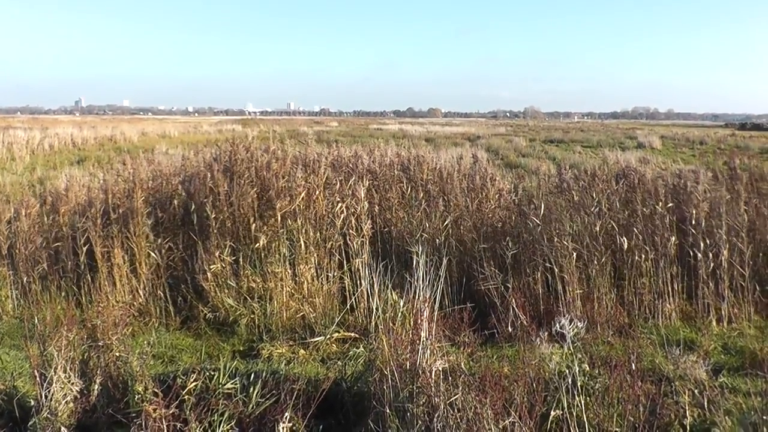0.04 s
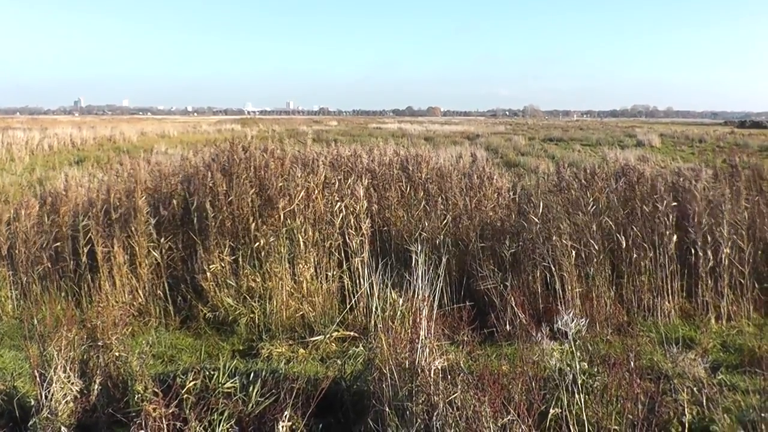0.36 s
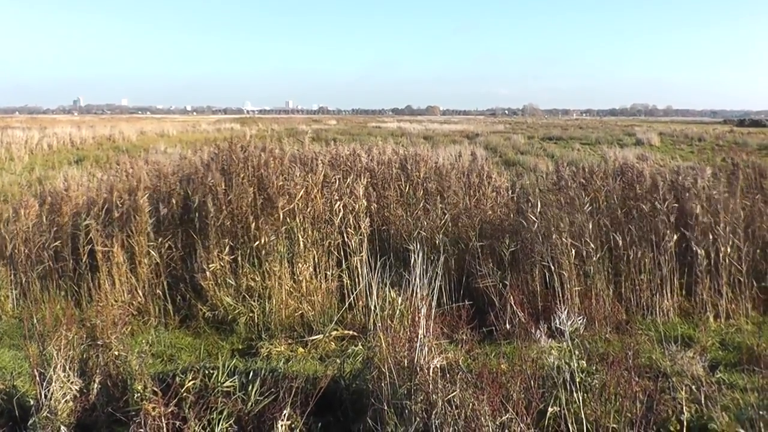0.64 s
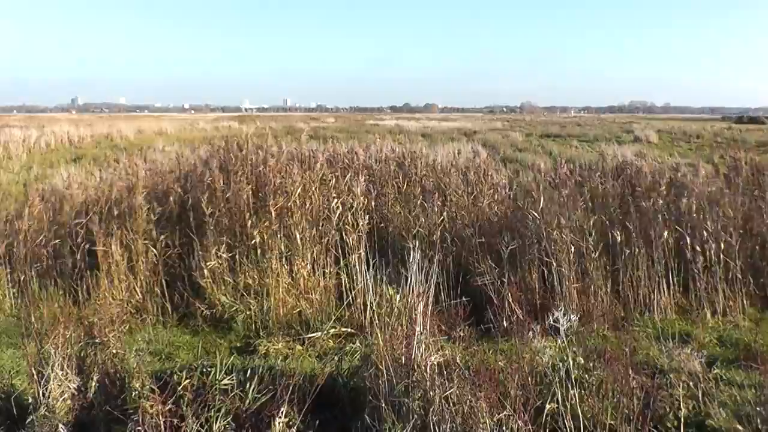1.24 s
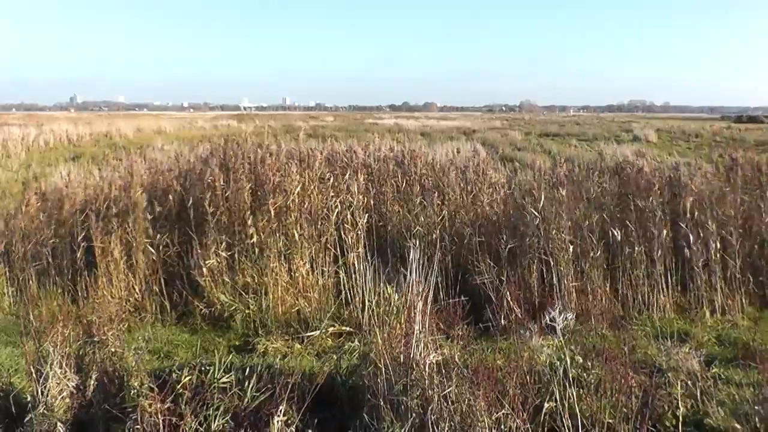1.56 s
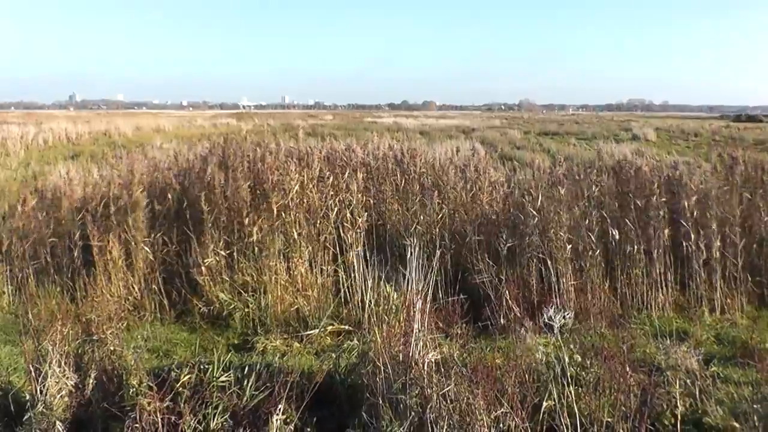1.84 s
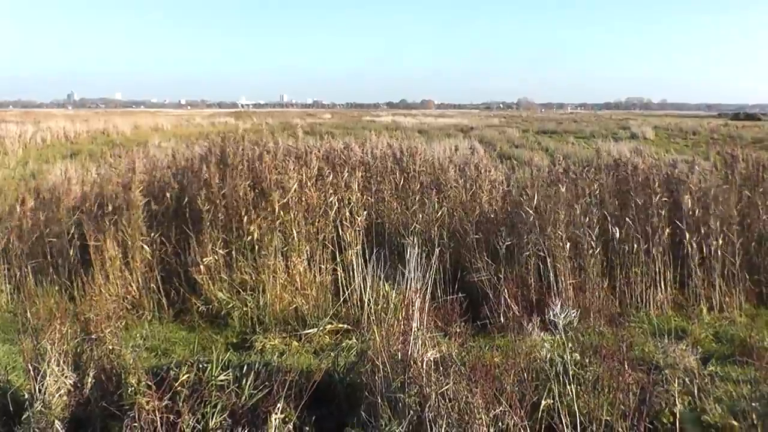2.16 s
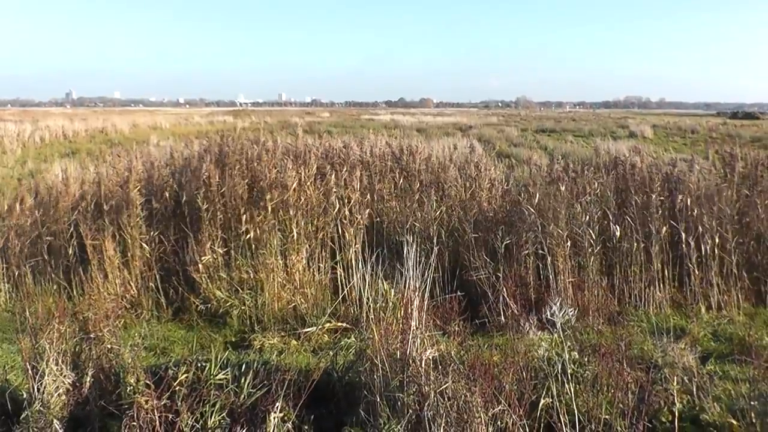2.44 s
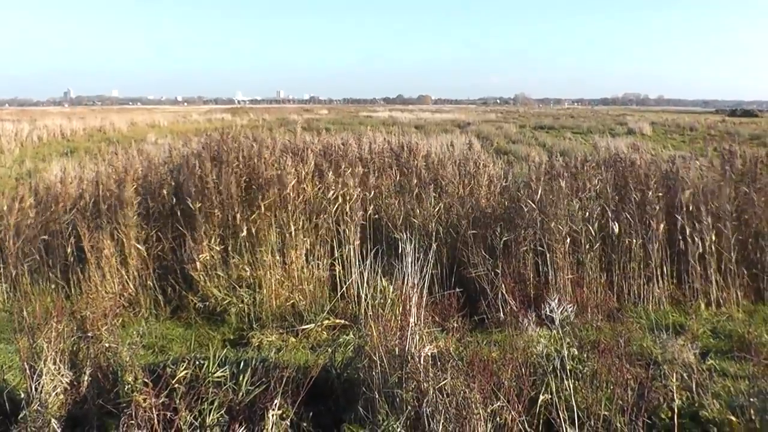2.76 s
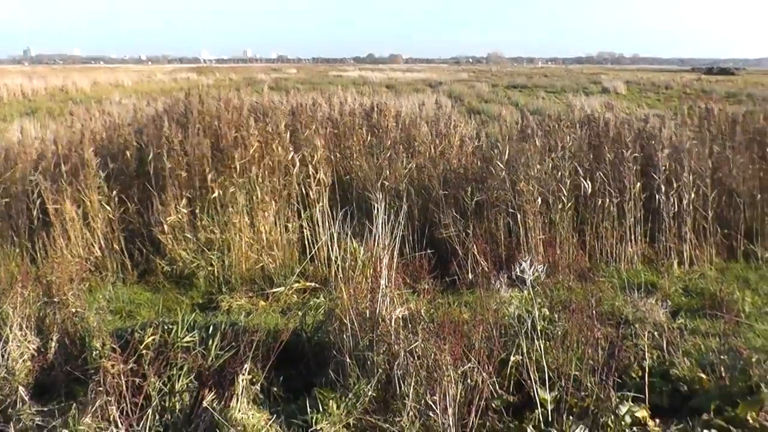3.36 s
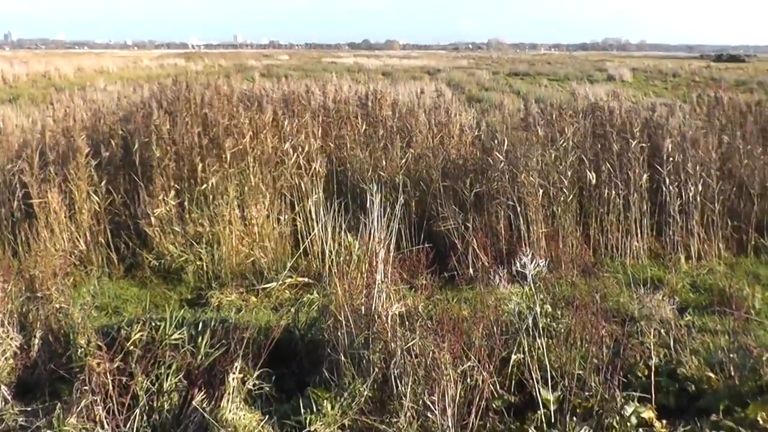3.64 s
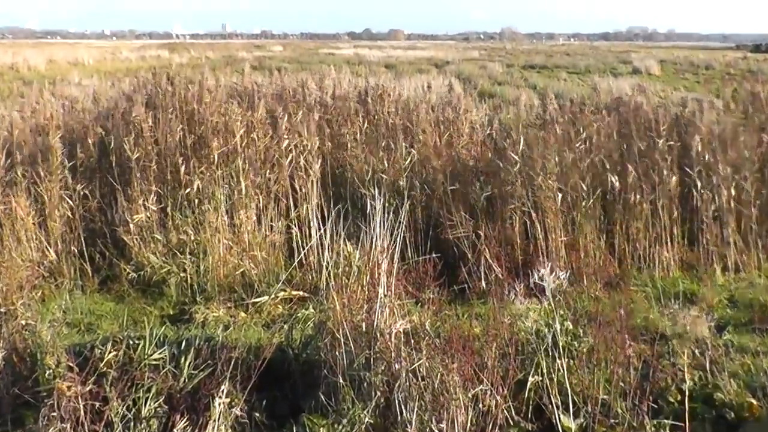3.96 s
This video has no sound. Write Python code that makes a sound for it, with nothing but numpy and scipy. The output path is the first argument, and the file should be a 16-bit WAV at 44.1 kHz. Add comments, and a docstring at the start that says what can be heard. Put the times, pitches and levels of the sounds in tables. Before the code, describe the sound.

A marsh bird squeals twice from the reeds over faint wind and hiss.

```python
"""Wind buffets the microphone at a reedbed, over distant air and hiss, as a hoarse groan rises.
It is a water rail hidden a little to the left, calling twice: each groan climbs to a held whistle
and falls away. The harmonics sweep through fixed throat resonances and scatter briefly among the
stems. Between the calls, dry reeds tick and brush."""
import sys
import numpy as np
from scipy import signal
from scipy.fft import rfft, irfft
from scipy.io import wavfile

SR = 44100
rng = np.random.default_rng(int(sys.argv[2]) if len(sys.argv) > 2 else 0)


def unload_audio(sound):
    """Save the sound as a 16-bit wav file, at the path given as the first command line argument."""
    columns = np.transpose(np.atleast_2d(sound))
    # keep every value between -1 and 1, then stretch to whole-number steps
    steps = np.round(np.clip(columns, -1, 1) * 32767)
    wavfile.write(sys.argv[1], SR, steps.astype(np.int16))


N = 176400
T = np.arange(N) / SR
BIN_HZ = np.arange(N // 2 + 1) * SR / N
SIDE = np.array([[1], [-1]])  # added on the left, subtracted on the right


def undb(db):
    return 10 ** (np.asarray(db) / 20)


def curve(rows, column=1):
    """One column of a table joined by straight lines in time."""
    rows = np.array(rows)
    return np.interp(T, rows[:, 0], rows[:, column])


def response(spectrum, hz):
    """Level of a spectrum in dB at the given frequencies."""
    points_hz, db = np.array(spectrum).T
    return np.interp(np.log(np.maximum(hz, 1)), np.log(points_hz), db)


def noise(spectrum):
    """Coloured noise of rms 1 that falls off steeply beyond the ends of its spectrum."""
    hz = BIN_HZ + 1
    skirt = np.minimum(1, np.minimum(hz / spectrum[0][0], spectrum[-1][0] / hz)) ** 4
    x = irfft(rfft(rng.standard_normal(N)) * undb(response(spectrum, hz)) * skirt, N)
    return x / x.std()


def wide(spectrum, side_db):
    """Stereo noise: a common centre and a weaker, unrelated side signal."""
    return noise(spectrum) + undb(side_db) * noise(spectrum) * SIDE


def walk(rate):
    """Smooth random drift of spread 1, changing about rate times a second."""
    x = irfft(rfft(rng.standard_normal(N)) * np.exp(-2 * (BIN_HZ / rate) ** 2), N)
    return x / x.std()


# Gusts right on the microphone. Each row: time in seconds, relative level in dB.
GUST_LEVEL = [(0.0, -55), (0.04, -51.5), (0.07, -58), (0.26, -48), (0.5, -61.5), (0.54, -51.5), (0.79, -56),
              (0.85, -44), (0.89, -54.5), (1.43, -64.5), (1.87, -63), (1.9, -44), (1.95, -54.5),
              (1.99, -48.5), (2.09, -70), (2.15, -58.5), (2.18, -60.5), (2.25, -70), (2.28, -42.5),
              (2.31, -42.5), (2.37, -47), (2.39, -55), (2.64, -56), (2.68, -49.5), (2.83, -60), (3.01, -56),
              (3.04, -43.5), (3.14, -54.5), (3.16, -39.5), (3.21, -51.5), (3.26, -45.5), (3.42, -44.5),
              (3.44, -51.5), (3.5, -43.5), (3.53, -48.5), (3.56, -42), (3.59, -47), (3.85, -64.5),
              (3.98, -55.5), (4.0, -52)]
# Their rumble. Each row: frequency in Hz, relative level in dB.
GUST_SPECTRUM = [(20, -16), (40, -9.5), (70, 0), (130, -3), (200, -10.5), (320, -19), (600, -31),
                 (1500, -48)]

def wind_buffet():
    """Gusts strike the microphone and rumble in uneven bursts."""
    return wide(GUST_SPECTRUM, side_db=-9.5) * undb(curve(GUST_LEVEL) + 0.5)


# Air far off over the reedbed. Each row: time in seconds, relative level in dB.
AIR_LEVEL = [(0.0, -60.5), (1.4, -61.5), (1.71, -62.5), (3.02, -60), (3.2, -62), (4.0, -61)]
# Its colour from here. Each row: frequency in Hz, relative level in dB.
AIR_SPECTRUM = [(60, 6), (200, -0.5), (400, -1.5), (650, -3.5), (880, -3.5), (1010, -8.5), (1180, -9.5),
                (1500, -11.5), (2150, -24), (3000, -19.5), (3900, -21), (4500, -49.5), (6000, -16)]

def distant_air():
    """Distant air makes a low, wide wash that wavers slightly."""
    return wide(AIR_SPECTRUM, side_db=-4.5) * undb(curve(AIR_LEVEL) + 4.5 + 0.28 * walk(16))


# Treble hiss, dead centre. Each row: time in seconds, relative level in dB.
HISS_LEVEL = [(0, -66.5), (0.7, -66.5), (1.8, -65), (2.3, -64.5), (2.9, -63.5), (3.3, -63.5), (4, -65.5)]
# Its colour. Each row: frequency in Hz, relative level in dB.
HISS_SPECTRUM = [(2590, -11), (4400, -9.5), (4640, -7.5), (5290, -7), (7690, 1), (8640, -1), (11100, -16),
                 (11900, -17.5), (15500, -25)]

def hiss():
    """A smooth hiss lies over the fainter noise of each microphone channel."""
    centre = wide(HISS_SPECTRUM, side_db=-38) * undb(curve(HISS_LEVEL) + 3.5)
    self_noise = np.array([noise([(5000, -21), (9000, 6), (15500, -4)]) for _ in range(2)])
    return centre + undb(-73) * self_noise


# Hoarseness of the bird in the reeds. Each row: time in seconds, roughness from 0 to 1.
HOARSENESS = [(.3, 0.7), (.42, 0.7), (.52, 0.66), (.56, 0.25), (.85, 0.18), (.89, 0.24), (.95, 0.24),
              (.99, .4), (1.04, 0.81), (2.95, 0.5), (3.08, 0.55), (3.17, 0.29), (3.3, 0.31), (3.45, 0.33),
              (3.6, 0.49)]

def syrinx(pitch, fade_s=0.0059):
    """Pitch, phase and envelope of the voice: the hoarser it is, the more it shakes and flutters."""
    rough, hz = curve(HOARSENESS), curve(pitch)
    jitter, waver = .014 * walk(700), .02 * walk(190)
    unsteady_hz = hz * (1 + rough * (jitter + waver))
    phase = 2 * np.pi * np.cumsum(unsteady_hz) / SR
    start, end = pitch[0][0], pitch[-1][0]
    gate = np.clip(np.minimum(T - start, end - T) / fade_s + .5, 0, 1)
    shimmer_db = 3.5 * rough * walk(205)
    return hz, phase, gate * undb(shimmer_db)


# Two groans, faint at the microphone. Each row: time in seconds, pitch in Hz, relative level in dB.
FIRST_GROAN = [(0.0, 773, -80), (0.12, 787, -81.5), (0.24, 775, -79), (0.29, 861, -66.5),
               (0.345, 912, -68.5), (0.4, 844, -68), (0.44, 835, -77)]
SECOND_GROAN = [(2.9, 797, -69), (2.955, 775, -66.5), (3.01, 856, -62), (3.055, 871, -64),
                (3.085, 785, -64.5), (3.105, 852, -66)]
# The groaning throat's resonances, then its air noise. Each row: frequency in Hz, gain in dB.
GROAN_THROAT = [(850, 2.5), (1650, 6), (2100, -18), (2600, -12.5), (3400, -0.5), (4200, -14), (6000, -15)]
GROAN_RASP = [(700, -23), (860, -12), (1100, -12), (1400, -8), (1700, 6), (2100, -22), (2900, -3),
              (3400, -0.5), (3900, -5), (4500, -16)]

def groan(rows, tone_db, rasp_db):
    """The low, hoarse start of a call: soft harmonics in a haze of air noise."""
    hz, phase, envelope = syrinx(rows)
    tone = sum(undb(response(GROAN_THROAT, k * hz)) * np.sin(k * phase) for k in range(1, 7))
    level = envelope * undb(curve(rows, column=2))
    return level * (undb(tone_db) * tone + undb(rasp_db) * noise(GROAN_RASP))


# Two squeals carrying out of the reeds. Each row: time in seconds, pitch in Hz.
FIRST_PITCH = [(0.45, 920.6), (0.476, 997), (0.486, 1077), (0.49, 1089), (0.51, 1052), (0.532, 1078),
               (0.54, 1114), (0.584, 1164), (0.6, 1301), (0.62, 1380), (0.644, 1286), (0.662, 1297),
               (0.674, 1424), (0.794, 1445), (0.846, 1474), (0.866, 1466), (0.89, 1415), (0.95, 1467),
               (0.996, 1366), (1.02, 1203), (1.042, 1185), (1.046, 1154), (1.07, 934)]
SECOND_PITCH = [(3.1, 889.3), (3.11, 920), (3.126, 966), (3.138, 1060), (3.15, 1101), (3.202, 1113),
                (3.218, 1171), (3.25, 1186), (3.264, 1300), (3.278, 1305), (3.29, 1400), (3.312, 1395),
                (3.32, 1343), (3.334, 1386), (3.348, 1333), (3.358, 1414), (3.43, 1457), (3.454, 1440),
                (3.46, 1422), (3.49, 1393), (3.51, 1460), (3.556, 1368), (3.574, 1315), (3.61, 1104),
                (3.622, 999.0), (3.625, 986.4)]
# Their swell. Each row: time in seconds, relative levels of fundamental and octave in dB.
FIRST_SWELL = [(0.45, -66, -80), (0.474, -66, -77), (0.488, -67.5, -78), (0.528, -66.5, -79),
               (0.546, -64, -75), (0.588, -58.5, -71), (0.622, -53.5, -53), (0.63, -55.5, -63),
               (0.662, -53.5, -65), (0.672, -53, -51), (0.794, -49, -48), (0.962, -49.5, -49.5),
               (1.056, -61, -72), (1.07, -61, -66)]
SECOND_SWELL = [(3.1, -72, -81), (3.122, -68.5, -72), (3.148, -67.5, -85), (3.24, -63.5, -72),
                (3.262, -59, -79), (3.3, -57.5, -56), (3.332, -58, -63), (3.382, -54.5, -59),
                (3.432, -56, -54.5), (3.482, -57, -65), (3.504, -56.5, -60), (3.578, -60, -76),
                (3.614, -66.5, -77), (3.625, -69, -74)]
# The squealing throat's resonances, then its air noise. Each row: frequency in Hz, gain in dB.
SQUEAL_THROAT = [(900, 2), (1100, -6.5), (1300, -4.5), (1450, -4.5), (2200, -25), (2850, -7), (3400, -0.5),
                 (3900, -5), (4250, -9), (4480, -16.5), (4800, -10.5), (5300, -14.5), (5800, -27),
                 (6400, -31), (7200, -20.5), (9000, -53)]
SQUEAL_RASP = [(900, -28), (1200, -9), (1700, -24), (2100, -34), (3000, -11), (3250, -10), (3480, -3),
               (3620, -6), (3850, 2), (4100, -1), (4350, -4), (4600, -22), (5500, -15), (7000, -16),
               (10000, -35)]

def squeal(pitch, swell, tone_db, upper_db, rasp_db, octave_db=1.5):
    """A whistle whose upper harmonics pass the throat resonances, with air rasping once a cycle."""
    hz, phase, envelope = syrinx(pitch)
    drive = undb(curve(swell) - response(SQUEAL_THROAT, hz))  # the fundamental follows the swell

    def harmonic(k):
        return drive * undb(response(SQUEAL_THROAT, k * hz)) * np.sin(k * phase)

    octave = undb(curve(swell, column=2) + octave_db) * np.sin(2 * phase)
    upper = sum(harmonic(k) for k in range(3, 7))
    whistle = np.sqrt(2) * (undb(tone_db) * harmonic(1) + octave + undb(upper_db) * upper)
    rasp = drive * curve(HOARSENESS) * noise(SQUEAL_RASP) * (1 + .5 * np.cos(phase))
    return envelope * (whistle + undb(rasp_db) * rasp)


# The bird's bearing from the microphone. Each row: frequency in Hz, left minus right in dB.
BIRD_PAN = [(900, 2), (1400, 3.8), (2000, 1), (2900, 0), (4000, .6), (7000, 0)]

def reedbed(voice, t60_s=0.14, scatter_db=-15.5):
    """The stems add a short scattered tail to the voice, which sits a little to the left."""
    t = T[:SR // 2]
    centre, side = rng.standard_normal((2, len(t))) * np.exp(-np.log(1000) * t / t60_s) * (t > .004)
    tail = centre + 0.17 * side * SIDE
    tail *= undb(scatter_db) / np.sqrt(np.sum(tail[0] ** 2))
    heard = voice + signal.fftconvolve(voice[None], tail, axes=1)[:, :N]
    return irfft(rfft(heard) * undb(SIDE * response(BIRD_PAN, BIN_HZ) / 2), N)


# Dry stems in front of the microphone.
# Each row: start in seconds, ring in Hz, relative level in dB, time to fall 60 dB in seconds.
STEM_TICKS = [(1.9845, 7400, -41.5, 0.014), (2.7903, 6550, -30.5, 0.0032)]

def stem_ticks(band_hz=(5200, 8400)):
    """Dry stems snap with a tiny, noisy ring."""
    snaps = np.zeros(N)
    for start, hz, db, t60_s in STEM_TICKS:
        age = np.maximum(T - start, 0)
        ring = np.sin(2 * np.pi * hz * age) + 0.57 * rng.standard_normal(N)
        snaps += undb(db) * ring * (age > 0) * np.exp(-np.log(1000) * age / t60_s)
    return signal.sosfilt(signal.butter(4, band_hz, "bandpass", fs=SR, output="sos"), snaps)


# Leaf on leaf among the reeds. Each row: frequency in Hz, relative level in dB.
LEAF_SPECTRUM = [(5000, -30), (8000, 0), (9700, 1), (12000, -14), (15000, -17)]

def leaf_brush(peak_s=2.104, width_s=.012):
    """One leaf rubs another in a brief, grainy swish."""
    swell = np.exp(-.5 * ((T - peak_s) / width_s) ** 2)
    return noise(LEAF_SPECTRUM) * swell * undb(-58.5 + 2 * walk(500))


def scene():
    """Wind at the microphone, two calls from the reeds and small stem noises between them."""
    background = wind_buffet() + distant_air() + hiss()
    voice = groan(FIRST_GROAN, tone_db=3.5, rasp_db=-1.5)
    voice += squeal(FIRST_PITCH, FIRST_SWELL, tone_db=-0.5, upper_db=0.5, rasp_db=-4)
    voice += groan(SECOND_GROAN, tone_db=0, rasp_db=-8)
    voice += squeal(SECOND_PITCH, SECOND_SWELL, tone_db=3, upper_db=3, rasp_db=-2)
    return background + reedbed(voice) + stem_ticks() + leaf_brush()


# Narrow dips in the microphone's response. Each row: centre in Hz, width in Hz.
MIC_DIPS = [(1010, 47), (4520, 190)]

def record(dry, top_hz=15700):
    """The microphone has two narrow dips, and the recorder cuts the top."""
    for hz, width_hz in MIC_DIPS:
        notched = signal.lfilter(*signal.iirnotch(hz, hz / width_hz, fs=SR), dry)
        dry = 0.22 * dry + 0.72 * notched
    return signal.sosfilt(signal.ellip(10, .2, 70, top_hz, fs=SR, output="sos"), dry)


dry = scene()
out = record(dry)
unload_audio(out)
```